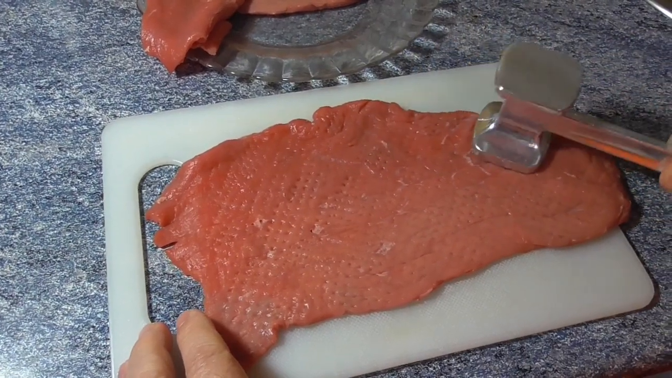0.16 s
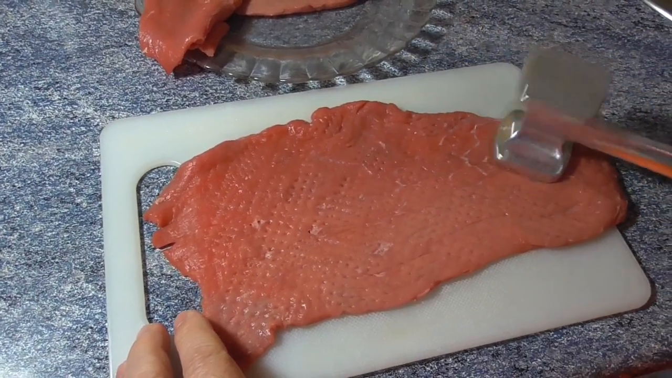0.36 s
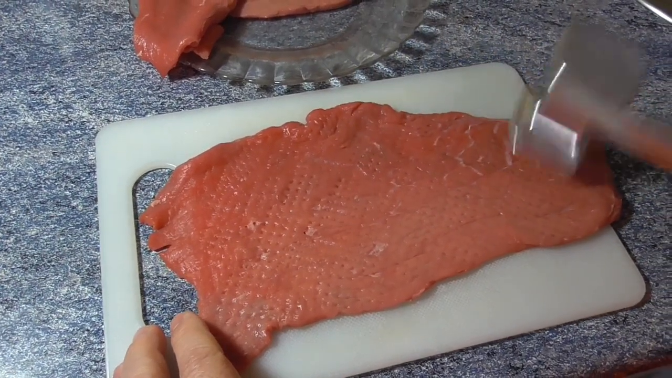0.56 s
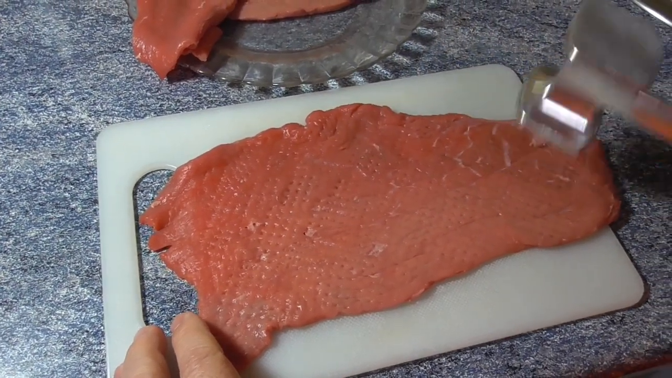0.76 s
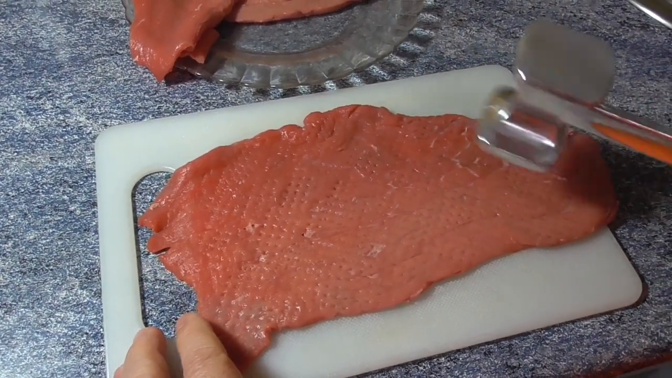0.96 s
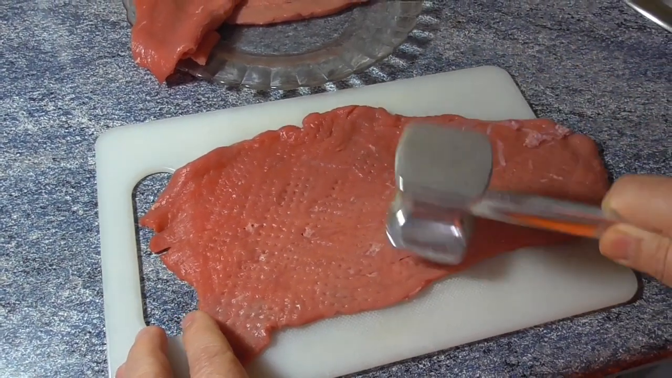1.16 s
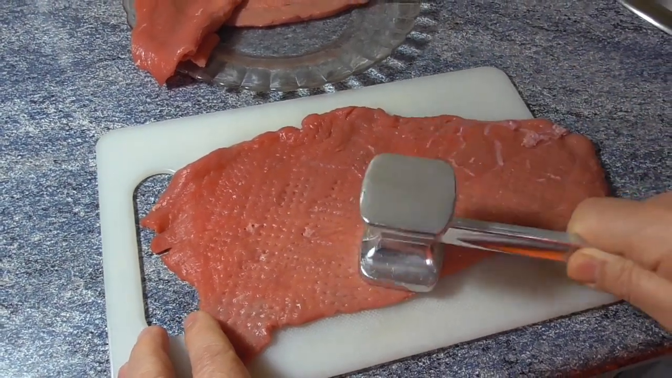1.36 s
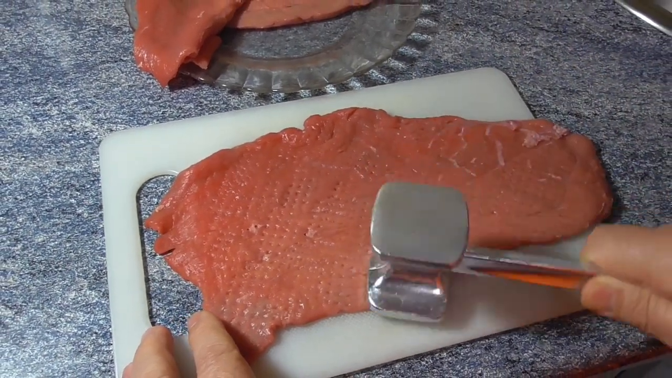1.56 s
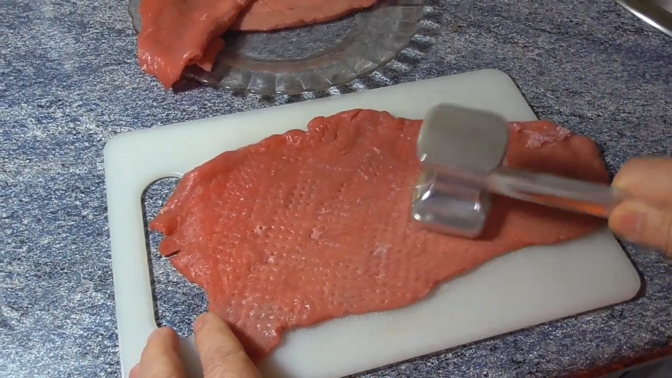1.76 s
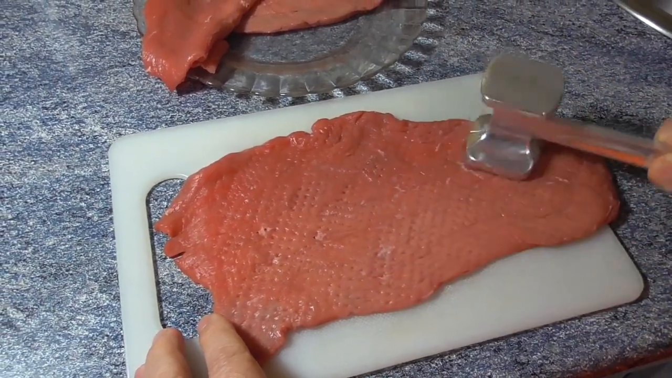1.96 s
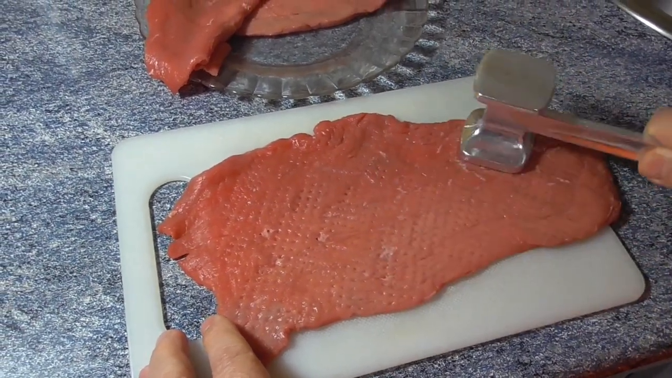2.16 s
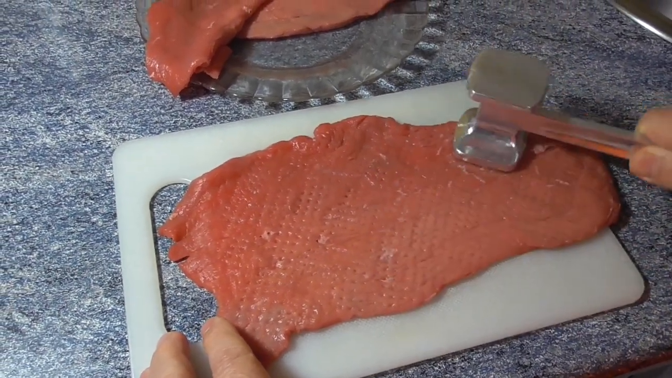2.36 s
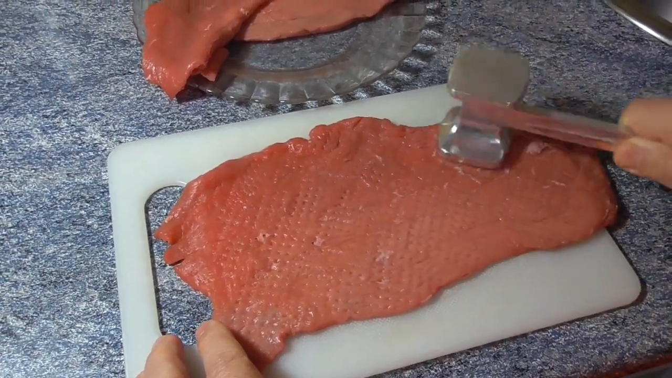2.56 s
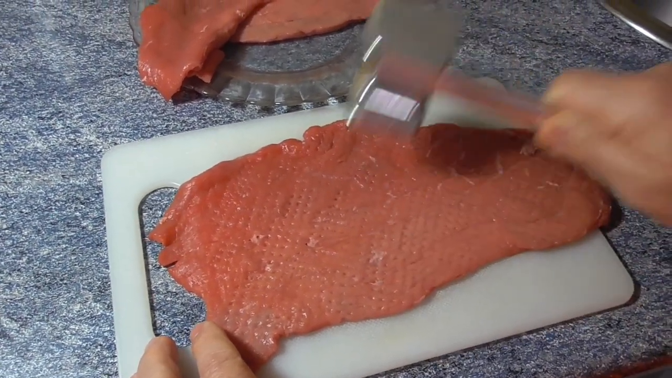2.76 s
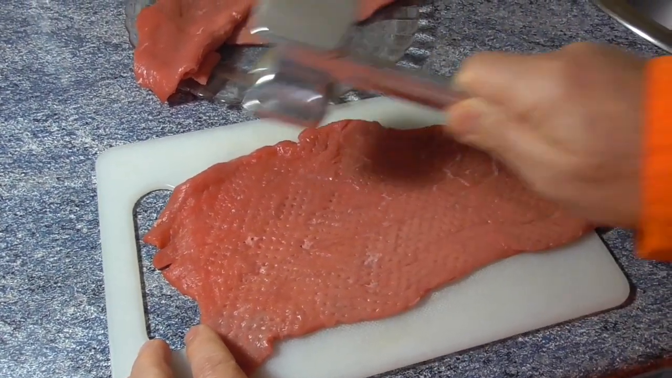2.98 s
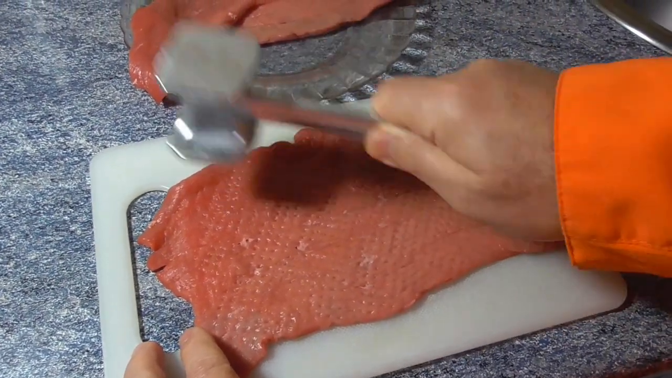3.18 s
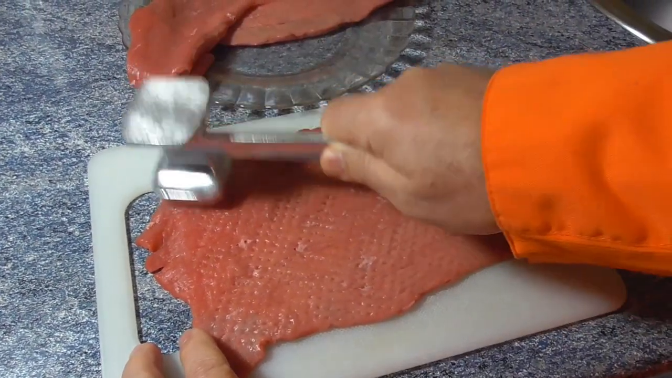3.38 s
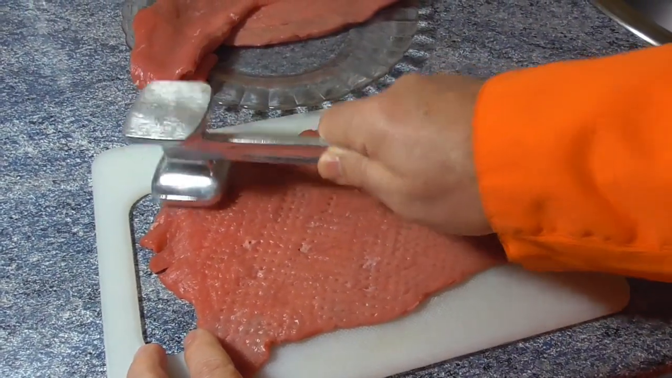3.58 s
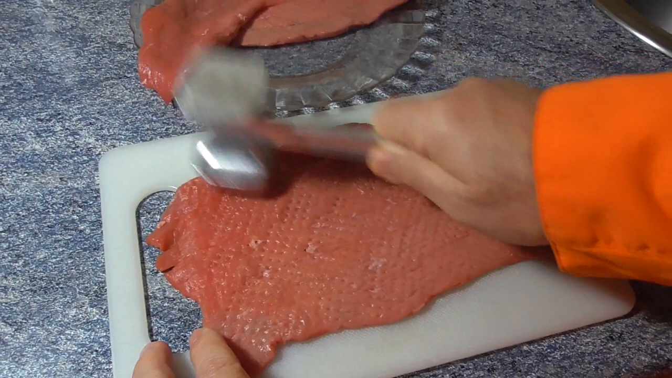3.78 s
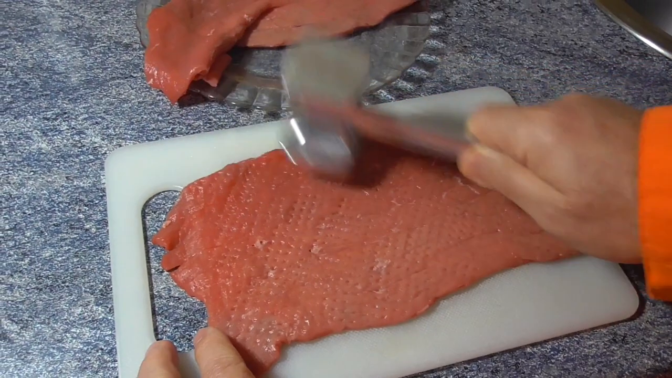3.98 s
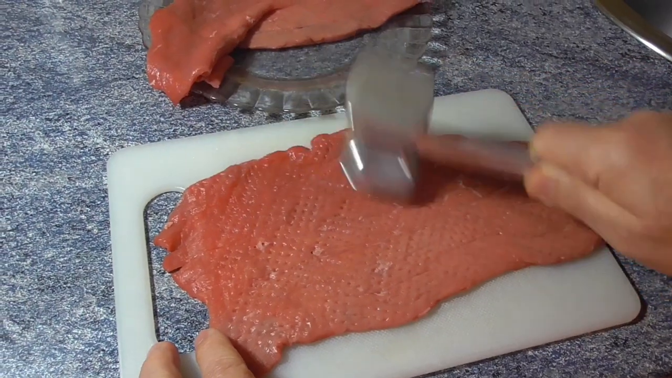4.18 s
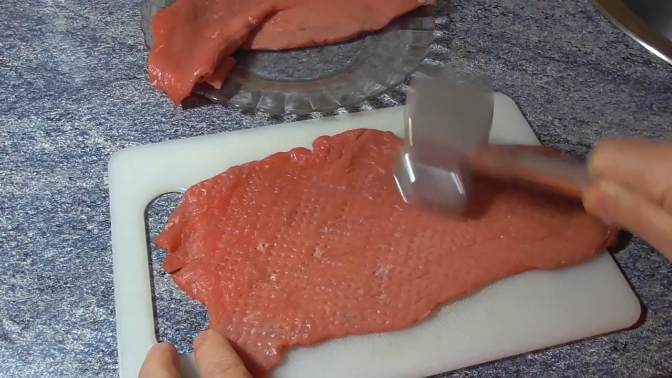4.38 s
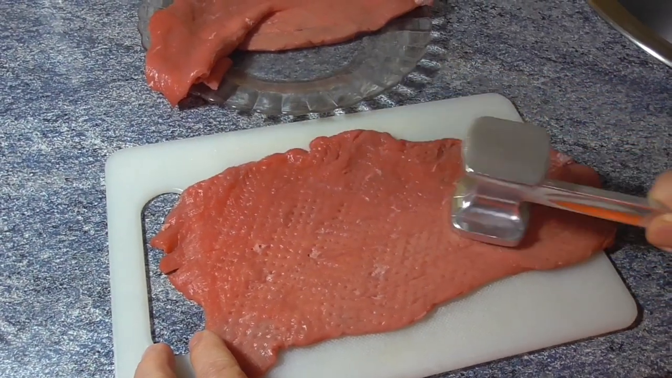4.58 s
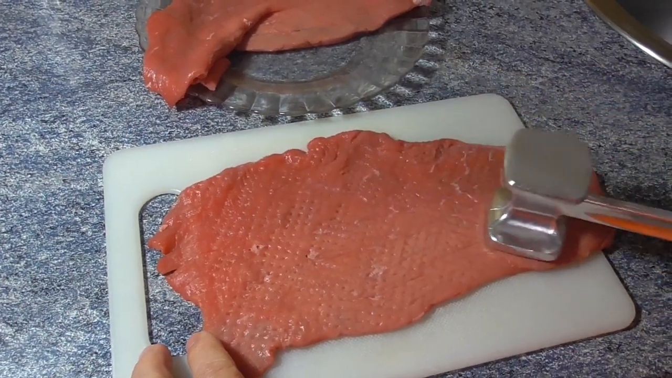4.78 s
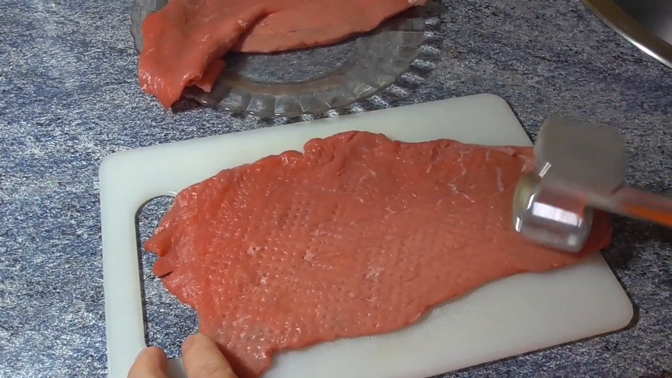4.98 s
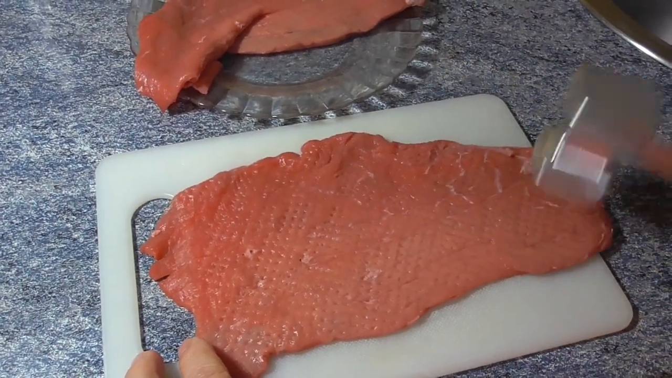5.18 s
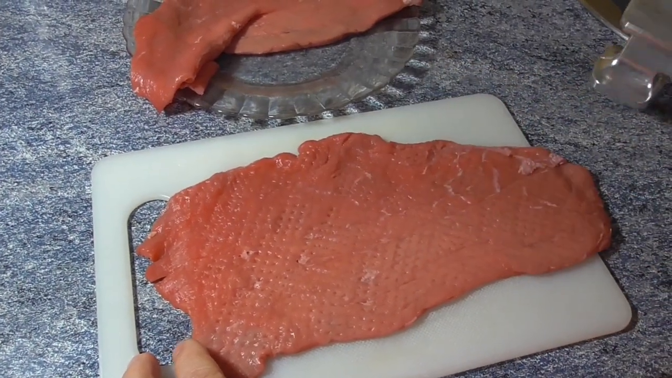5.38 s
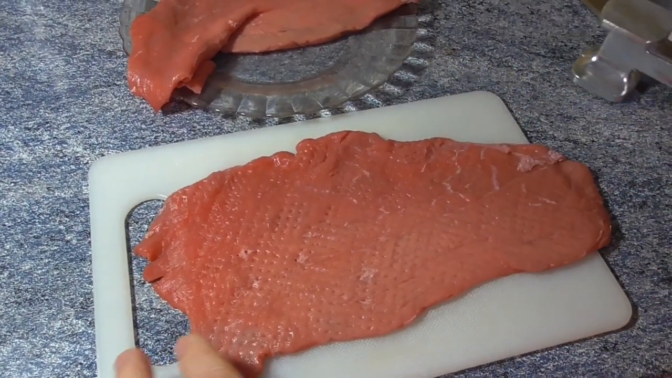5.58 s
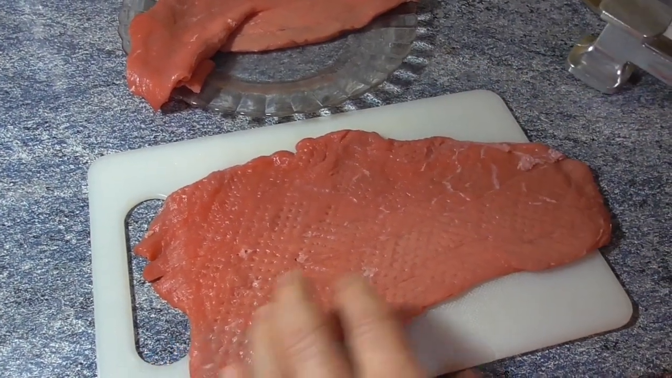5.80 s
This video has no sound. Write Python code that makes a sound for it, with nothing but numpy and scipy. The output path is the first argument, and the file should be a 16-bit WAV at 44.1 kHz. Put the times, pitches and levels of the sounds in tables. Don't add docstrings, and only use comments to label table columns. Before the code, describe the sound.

A metal mallet pounds thin wet meat on a plastic board in fast even slaps, then is set down with a rattling bounce and a clink.

```python
import sys
import numpy as np
from scipy import signal
from scipy.fft import rfft, irfft, next_fast_len
from scipy.io import wavfile

SR = 44100
rng = np.random.default_rng(int(sys.argv[2]) if len(sys.argv) > 2 else 0)


def persist_wave(psi):
    counts = np.round(np.clip(psi, -1, 1) * 32767).astype(np.int16)
    wavfile.write(sys.argv[1], SR, np.atleast_2d(counts).T)


def ratio_of_db(decibels):
    return 10 ** (np.asarray(decibels, float) / 20)


N = 257544

# start in seconds, slap level in dB,
# board knock in dB, weight on the counter in dB, brightest frequency in Hz.
NEAR_BLOWS = [(-0.027, -6.5, -22.5, -7.5, 8200), (0.2045, -8.5, -19.5, -6.5, 6990),
              (0.4341, -9.5, -18, -5.5, 7880), (0.6534, -7, -24, -10.5, 3990),
              (0.8854, -7, -24.5, -8.5, 4120), (1.1776, -9, -18.5, -7, 7840), (1.389, -7.5, -14, -6, 8660),
              (1.5931, -11.5, -17.5, -7.5, 7260), (1.8247, -13.5, -32, -10, 7930),
              (2.0146, -9, -17.5, -8.5, 10400), (2.2269, -8.5, -22, -9.5, 7550),
              (2.4271, -9.5, -19, -8, 10400), (2.6295, -11, -19.5, -7.5, 10700),
              (2.8841, -6, -19.5, -8.5, 8130), (4.2703, -6.5, -17, -10.5, 8420),
              (4.4702, -7.5, -25, -12, 8540), (4.6521, -9.5, -30.5, -10.5, 7870),
              (4.8361, -8.5, -28, -12.5, 7990), (4.987, -9, -26, -14, 3440), (5.1409, -9, -23, -12.5, 4020)]
FAR_END_BLOWS = [
    (3.153, -7, -19.5, -11, 7560),
    (3.3975, -15, -22, -5.5, 10200),
    (3.608, -6, -16, -16, 3630),
    (3.8725, -25, -34.5, -18, 3260),
    (4.0778, -16, -27, -9.5, 8560),
]
# time in seconds, distance 0-1 from the panel that drums best.
HAND_REACH = [(0, 0.22), (.45, 0.41), (.65, 0.24), (.9, 0.38), (1.2, 0.62), (1.6, 0.65), (1.85, 0.62),
              (2.0, 0), (2.45, 0), (2.9, 0.78), (4.27, 0.63), (4.47, 0.17), (4.84, 0.81), (5.14, 0.13)]
# frequency in Hz, level in dB per Hz.
SLAP_SPECTRUM = [(600, -4.5), (1500, -2), (2500, -5.5), (4000, -4.5), (6000, -7), (8000, -2.5),
                 (11000, -4.5), (13500, -10.5), (16000, -27.5)]
# frequency in Hz, width in Hz, level in dB.
BOARD_PEAKS = [(958, 110, 4.5), (1163, 256, 2), (1480, 60, -6)]
# frequency in Hz, width in Hz, level in dB.
AIR_GAP_PEAKS = [(550, 58, -1), (593, 55, 3.5), (754, 120, 5)]
# frequency in Hz, level in dB, T60 in seconds,
# left gain, right gain; the gain's sign is the first swing.
COUNTER_MODES = [(64.2, -40.9, 0.741, 1.09, 0.91), (84.5, -34.5, 0.415, -0.94, -1.06),
                 (114.7, -6.9, 0.187, -1.03, -0.97), (125.5, -3.9, 0.575, 1.08, 0.92),
                 (125.4, -0.7, 0.43, -1.09, -0.91), (143.9, -8.4, 0.21, -1.04, -0.96),
                 (155.1, 3.5, 0.022, 1.06, 0.94)]
PANEL_MODES = [(190.4, -22.1, 0.38, -1.04, -0.96), (207.5, -25.0, 0.607, -0.98, -1.02),
               (232.1, -9.5, 0.357, 1.02, 0.98), (251.3, -8.6, 0.135, 1.24, 0.76),
               (275.4, -5.2, 0.134, -1.07, -0.93), (287.6, -11.1, 0.249, -1.11, -0.89)]
STIFF_PANEL_MODES = [(305.0, 12.4, 0.095, 0.95, 1.05), (304.1, 4.5, 0.189, -0.98, -1.02),
                     (321.5, 0.3, 0.183, 0.87, 1.13), (316.1, 7.8, 0.094, -0.95, -1.05),
                     (352.9, -10.4, 0.094, -0.71, -1.29), (380.9, -13.0, 0.178, -0.97, -1.03),
                     (394.5, -18.3, 0.221, -1.1, -0.9), (412.0, -15.4, 0.2, -0.73, -1.27),
                     (449.9, -22.8, 0.345, -1.0, -1.0), (442.5, -26.5, 0.205, -0.06, -1.94),
                     (491.7, -20.4, 0.056, 1.31, 0.69), (544.4, -26.1, 0.23, 0.7, 1.3),
                     (595.6, -47.1, 0.171, 6.79, -8.79), (601.6, -25.9, 0.055, -0.53, 2.53)]
FAR_PANEL_MODES = [(191.4, -9.5, 0.25, -1.2, -1.1), (228.4, -8.5, 0.29, 1, 1), (258, -9.5, 0.2, 0.75, 1),
                   (284.7, -14.5, 0.52, 0.84, 0.83), (300, 0.5, 0.089, 0.94, 0.66),
                   (320.8, -4.5, 0.19, -1.06, -0.74), (350, -2.5, 0.13, -0.64, -0.95),
                   (383, -7, 0.14, -1.1, -1), (443, -16, 0.41, 0.47, 0.83), (519, -12, 0.066, 1.4, 1)]
# start in seconds, level in dB,
# T60 in seconds, frequency in Hz.
BOARD_JUDDERS = [
    (3.612, 0.5, 0.19, 580),
    (2.5, -23, 0.2, 390),
    (.89, -18, 0.26, 700),
]
DISH_MODES = [(1250, -54, 2.2, 1, .8)]
# start in seconds, level in dB, frequency in Hz,
# width in Hz, T60 in seconds.
STICKY_TICKS = [
    (0.728, -35, 8650, 9000, 0.0076),
    (5.016, -44, 11500, 5000, .007),
    (5.484, -47, 2660, 400, .04),
    (5.484, -46.5, 3700, 497, 0.04),
    (5.49, -62, 6000, 8000, .9),
    (5.512, -51, 7600, 400, 0.11),
    (5.512, -48, 2700, 500, .04),
    (5.545, -57, 4100, 1200, 0.13),
]
# start in seconds, peak in dB, head ring in dB, click in dB.
MALLET_BOUNCES = [
    (5.613, -1.5, -48, -27),
    (5.637, -9.5, -57, -49),
    (5.661, -6, -38.5, -26.5),
    (5.676, -9.5, -70, -38),
    (5.691, -4.5, -56, -34),
    (5.713, -17.5, -51, -43),
    (5.725, -12, -64, -37),
    (5.74, -16.5, -57, -42),
]
# frequency in Hz, width in Hz, level in dB.
REST_PEAKS = [(200, 100, -2.5), (322.8, 6.6, 4), (627, 20, -19), (782, 112, 4.5), (940, 31, -2.5),
              (951, 57, 6.5), (1200, 58, 2), (1258, 74, 0), (1530, 250, -14)]
# frequency in Hz, level in dB per Hz.
CLICK_SPECTRUM = [(1500, -6), (3000, 2), (4800, -2), (6000, -13.5), (7500, -5.5), (11000, -16),
                  (13000, -17), (14200, -60)]
HEAD_MODES = [(3644, -1, .6, 1, 1.2), (10650, -7, .25, -1, -1), (12740, -6, .33, 1, 1.1)]
# start in seconds, peak in dB, counter knock in dB.
STEEL_CLINKS = [
    (5.7793, -2.5, -22.5),
    (5.7844, -17, -19),
    (5.7994, -15, -6.5),
    (5.8164, -14.5, -3),
    (5.8254, -23, -8),
]
STEEL_MODES = [(2190, -9.5, 0.35, 0.83, 1.5), (2470, -16, .03, -0.89, -1.1), (3570, 3.5, 0.15, 0.64, 1.2),
               (4323, -11, .3, -0.7, -1.4), (8176, 4, 0.78, 0.76, 0.68), (8823, -32, .13, -1.3, -0.87),
               (10900, -15.5, .1, 1, 1.2), (12000, -30, 0.55, -0.9, -1)]
# frequency in Hz, T60 in seconds.
KITCHEN_T60 = [(100, 0.17), (400, 0.43), (1200, 0.25), (4000, 0.31), (9000, 0.24), (15000, 0.31)]
# frequency in Hz, level in dB.
WALL_SHARE = [(100, -3.5), (300, -11.5), (1000, -3), (3000, -6.5), (8000, -6), (15000, -15)]
# frequency in Hz, side under mid in dB.
DIFFUSE_WIDTH = [(100, -21), (380, -8), (700, -5), (2400, -4.5), (8000, 0.1)]
# frequency in Hz, level in dB per Hz.
HUM_SPECTRUM = [(25, -20.5), (60, -14.5), (95, -0.5), (125, -8.5), (300, -11), (700, -22.5), (1400, -27.5),
                (1900, -40.5), (5000, -46), (10000, -41), (14800, -47), (16500, -66.5)]

PAD, LONG = SR // 10, SR // 2
DRUM_DB, DRUM_FADE_DB = 1.5, 7.5
RIBS_DB, RIBS_FADE_DB = 3, 11.5
ECHO_DB, ECHO_FADE_DB = 0.26, 5
HOLLOW_DB, FAR_HOLLOW_DB = -0.15, -3.5
FAR_DRUM_DB = 2.5
LEAD_S, THUD_LEAD_S = 0.004, 0.0013
AIR_HZ, AIR_OCTAVES_PER_DB, FIRM_DB = 19000, 0.06, -21
TOP_HZ = 15900


def along(points, hz):
    f, v = np.transpose(points)
    return np.interp(np.log(hz + 1), np.log(f + 1), v)


def filtered(x, response):
    m = next_fast_len(x.shape[-1] + SR // 10)
    spectrum = rfft(x, m) * response(np.fft.rfftfreq(m, 1 / SR))
    return irfft(spectrum, m)[..., :x.shape[-1]]


def resonances(peaks):
    def response(f):
        total = 0
        for k, (hz, width_hz, db) in enumerate(peaks):
            damping = 1j * f * width_hz
            total = total + (-1) ** k * ratio_of_db(db) * damping / (hz * hz - f * f + damping)
        return total
    return response


def ring(modes, scatter_db):
    hz, db, t60_s, *sides = np.transpose(modes)[..., None]
    t = np.arange(LONG) / SR
    level_db = db + scatter_db * rng.standard_normal(hz.shape)
    parts = ratio_of_db(level_db - 60 * t / t60_s) * np.sin(2 * np.pi * hz * t)
    return np.array([(parts * gain).sum(0) for gain in sides])


def push(contact_s):
    phase = np.minimum(np.arange(LONG) / SR / contact_s, 1)
    force = np.maximum(np.sin(np.pi * phase), 0)
    return force / force.sum()


def burst(start_s, rise_s, t60_s):
    t = np.arange(LONG) / SR - start_s
    return rng.standard_normal(LONG) * ratio_of_db(-60 * np.where(t < 0, -t / rise_s, t / t60_s))


def spread(pair):
    mid, side = filtered(pair, lambda f: np.array([f * 0 + 1, ratio_of_db(along(DIFFUSE_WIDTH, f))]))
    return np.array([mid + side, mid - side])


def placed(x, pan_db):
    return x * ratio_of_db(np.array([[1], [-1]]) * pan_db / 2)


def kitchen(x):
    hz, t, z = signal.stft(rng.standard_normal((2, LONG)), SR, nperseg=256)
    decay = ratio_of_db(-60 * t / along(KITCHEN_T60, hz)[:, None])
    tail = signal.istft(z * decay, SR, nperseg=256)[1][:, :LONG]
    tail = spread(tail / np.linalg.norm(tail[0]))
    tail = np.pad(tail, ((0, 0), (200, 0)))
    sent = filtered(x, lambda f: ratio_of_db(along(WALL_SHARE, f)))
    return signal.fftconvolve(sent[None], tail, axes=1)[:, :LONG]


def add(out, start_s, x, outward):
    at = PAD + round(start_s * SR)
    out[:, at:at + LONG] += x + kitchen(outward)


def wet_slap(db, knock_db, bright_hz):
    smack_s = LEAD_S + rng.uniform(0.0028, 0.0059)
    air_hz = AIR_HZ * 2 ** (AIR_OCTAVES_PER_DB * min(knock_db - FIRM_DB, 0))

    def wet():
        air = burst(LEAD_S + 0.00049, 0.0016, 0.0054)
        smack_back = ratio_of_db(-12.0) * burst(smack_s, 0.0049, 0.02)
        juice = ratio_of_db(-16.5) * burst(LEAD_S, 0.0045, 0.038)
        return air + smack_back + juice

    def colour(f):
        bright_db = 4.35 * np.exp(-(np.log((f + 1) / bright_hz) / 0.15) ** 2)
        return ratio_of_db(db + along(SLAP_SPECTRUM, f) + bright_db) / (1 + (f / air_hz) ** 8)

    source = wet() + ratio_of_db(-2.5) * spread(np.array([wet(), wet()]))
    slap = placed(filtered(source, colour), pan_db=-1.1)
    puff = ratio_of_db(15) * filtered(np.arange(LONG) == round(LEAD_S * SR), colour)
    return slap, puff


def board_knock(knock_db, hollow_db):
    board, gap = resonances(BOARD_PEAKS), resonances(AIR_GAP_PEAKS)
    rattle = ratio_of_db(23) * push(0.00057) + ratio_of_db(-5.5) * burst(0.0012, 0.015, 0.051)

    def response(f):
        delay = np.exp(-2j * np.pi * f * LEAD_S)
        return (board(f) - ratio_of_db(hollow_db) * gap(f)) * delay

    return ratio_of_db(knock_db + 13.5) * filtered(rattle, response)


def counter_ring(modes):
    delay = round((LEAD_S - THUD_LEAD_S) * SR)
    return np.pad(ring(modes, 0), ((0, 0), (delay, 0)))[:, :LONG]


def slaps(out):
    boom, drum = counter_ring(COUNTER_MODES), counter_ring(PANEL_MODES)
    ribs, far_drum = counter_ring(STIFF_PANEL_MODES), counter_ring(FAR_PANEL_MODES)
    for blows, near in ((NEAR_BLOWS, True), (FAR_END_BLOWS, False)):
        for s, db, knock_db, weight_db, bright_hz in blows:
            reach = np.interp(s, *np.transpose(HAND_REACH))
            echo_db = ECHO_DB - ECHO_FADE_DB * reach
            if near:
                hollow_db = HOLLOW_DB
                panels = ratio_of_db(DRUM_DB - DRUM_FADE_DB * reach) * drum
                panels = panels + ratio_of_db(RIBS_DB - RIBS_FADE_DB * reach) * ribs
                panels = ratio_of_db(weight_db) * panels
            else:
                hollow_db = FAR_HOLLOW_DB
                panels = ratio_of_db(knock_db + FAR_DRUM_DB) * far_drum
            body = ratio_of_db(weight_db) * boom + panels
            slap, puff = wet_slap(db, knock_db, bright_hz)
            knock = board_knock(knock_db, hollow_db)
            outward = ratio_of_db(echo_db) * (puff + knock) + body.mean(0)
            add(out, s - LEAD_S, slap + placed(knock, pan_db=-1.0) + body, outward)


def rest_knock(x):
    wood = resonances(REST_PEAKS)
    return filtered(x, lambda f: wood(f) / (1 + 1j * f / 3200) ** 3)


def bounces(out):
    for s, db, ring_db, click_db in MALLET_BOUNCES:
        knock = rest_knock(-ratio_of_db(29.5) * push(0.00043) + ratio_of_db(-4) * burst(0.00306, 0.002, 0.11))
        click = filtered(burst(0.00035, 0.0045, 0.025), lambda f: ratio_of_db(along(CLICK_SPECTRUM, f)))
        contact = ratio_of_db(db) * (knock + ratio_of_db(click_db + 9.5) * click)
        rings = ratio_of_db(ring_db) * ring(HEAD_MODES, 0.98) + ratio_of_db(-22) * ring(COUNTER_MODES, 0)
        add(out, s, placed(contact, pan_db=-3.5) + ratio_of_db(db) * rings, contact)


def clinks(out):
    steel_contact = resonances([(2470, 630, 2.0), (4380, 880, -5.5), (8200, 3200, -11.5)])
    for s, db, knock_db in STEEL_CLINKS:
        chatter = filtered(burst(0.00013, 0.0032, 0.0098), steel_contact)
        chatter = filtered(chatter, lambda f: 1 / (1 + (f / 11500) ** 8))
        knock = rest_knock(burst(0.00069, 0.0034, 0.051))
        contact = ratio_of_db(db) * (chatter + ratio_of_db(knock_db + 11.5) * knock)
        add(out, s, placed(contact, pan_db=-4.5), contact)
    steel = ratio_of_db(-29) * ring(STEEL_MODES, scatter_db=0)
    add(out, STEEL_CLINKS[0][0], steel, steel.mean(0))


def judder(out):
    for s, db, t60_s, hz in BOARD_JUDDERS:
        broad = resonances([(hz, hz / 1.58, 0)])
        shake = ratio_of_db(db) * filtered(burst(0.0034, 0.01, t60_s), lambda f: broad(f) ** 2)
        add(out, s - 0.004, placed(shake, pan_db=-3.5) + ratio_of_db(db) * ring(DISH_MODES, 0), shake)


def ticks(out):
    for s, db, hz, width_hz, t60_s in STICKY_TICKS:
        narrow = resonances([(hz, width_hz, 0)])
        click = ratio_of_db(db) * filtered(burst(0.0063, 0.0073, t60_s), lambda f: narrow(f) ** 2)
        add(out, s - 0.002, placed(click, pan_db=-4), click)


def hum():
    noise = spread(rng.standard_normal((2, N)))
    noise = filtered(noise, lambda f: ratio_of_db(along(HUM_SPECTRUM, f)))
    return ratio_of_db(-53) * noise / noise.std()


def scene():
    out = np.zeros((2, PAD + N + LONG))
    for source in (slaps, bounces, clinks, judder, ticks):
        source(out)
    return out[:, PAD:PAD + N] + hum()


def top_cut(x):
    return signal.sosfilt(signal.butter(12, 16520, fs=SR, output="sos"), x)


def record(dry):
    def microphone(f):
        return (1j * f / (1j * f + 40)) ** 2 / (1 + (f / TOP_HZ) ** 40)

    mix = filtered(np.clip(dry, -1, 1), microphone)
    return top_cut(mix)


dry = scene()
out = record(dry)
persist_wave(out)
```